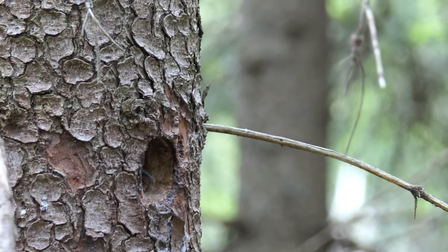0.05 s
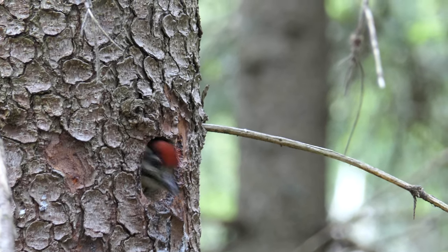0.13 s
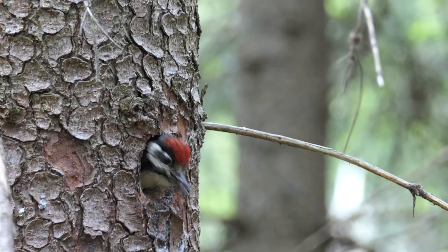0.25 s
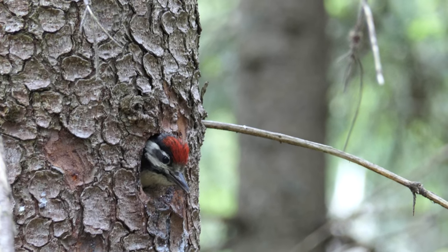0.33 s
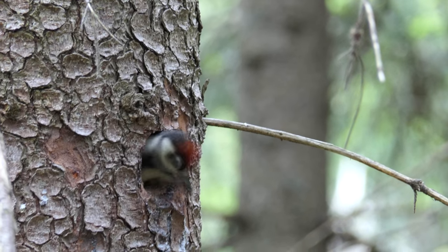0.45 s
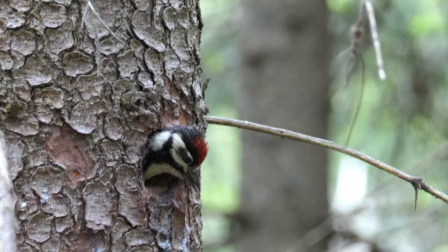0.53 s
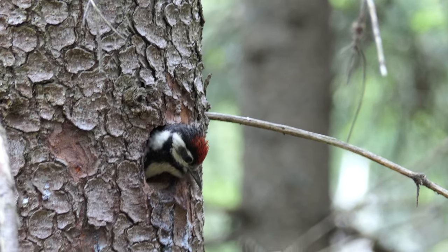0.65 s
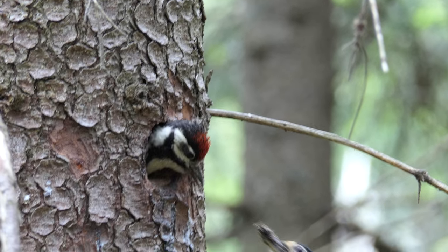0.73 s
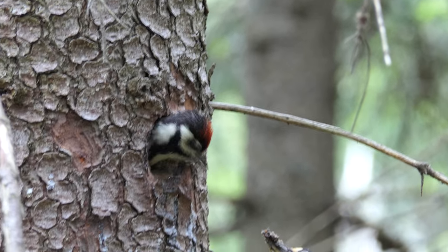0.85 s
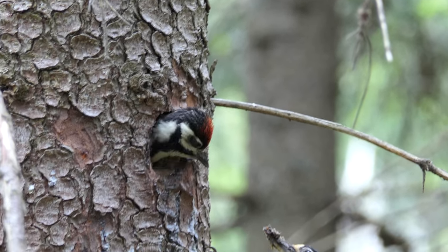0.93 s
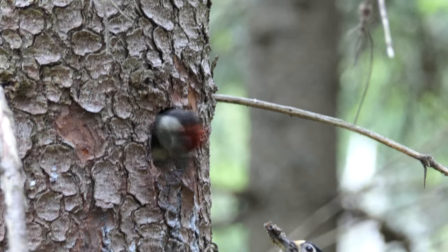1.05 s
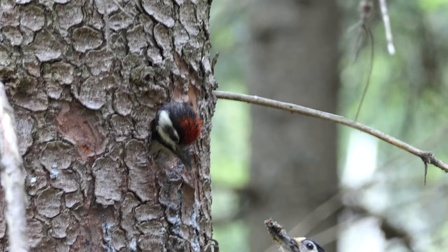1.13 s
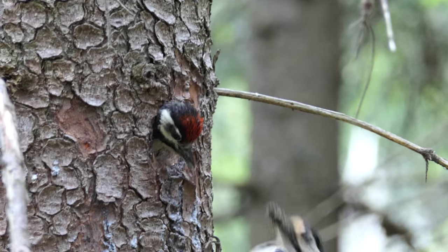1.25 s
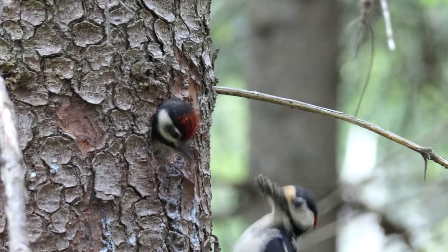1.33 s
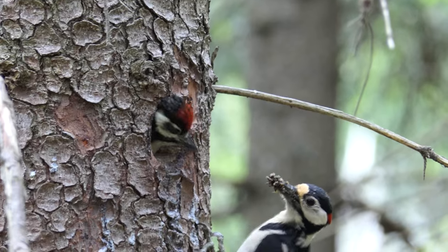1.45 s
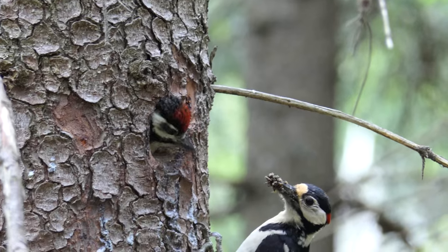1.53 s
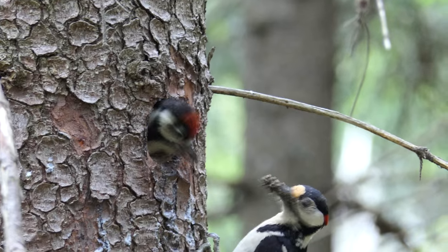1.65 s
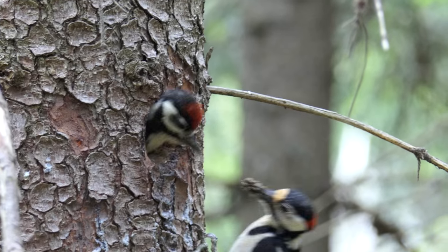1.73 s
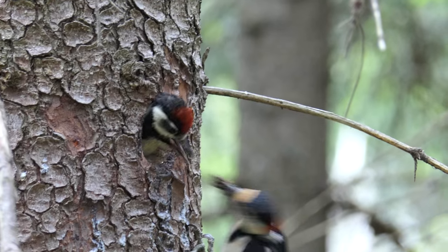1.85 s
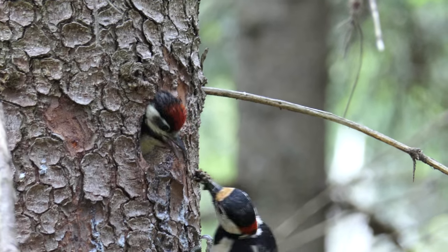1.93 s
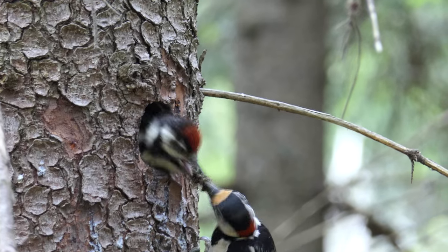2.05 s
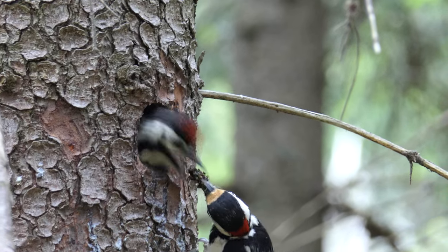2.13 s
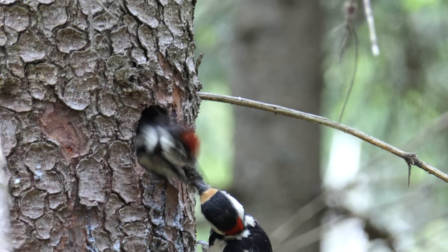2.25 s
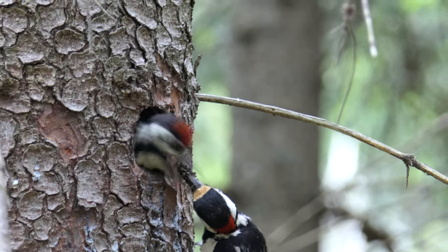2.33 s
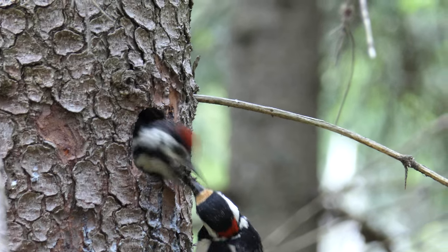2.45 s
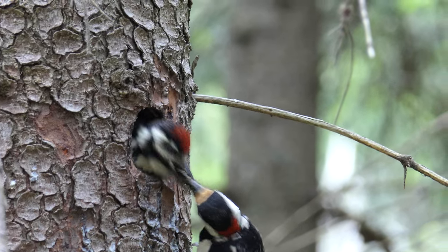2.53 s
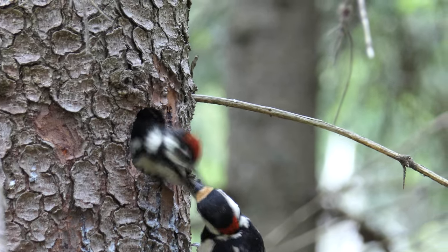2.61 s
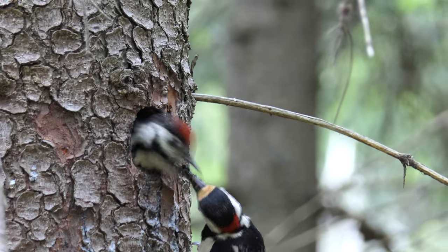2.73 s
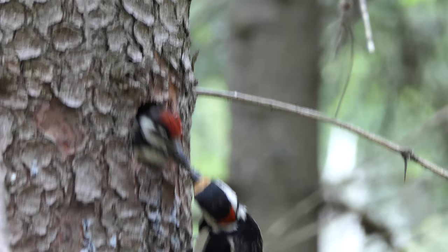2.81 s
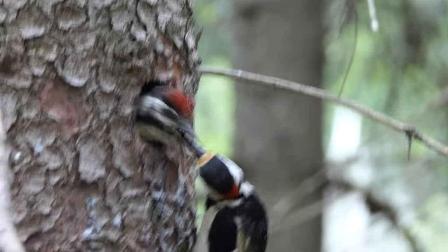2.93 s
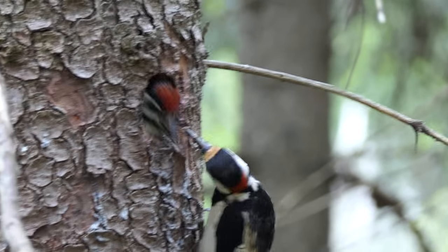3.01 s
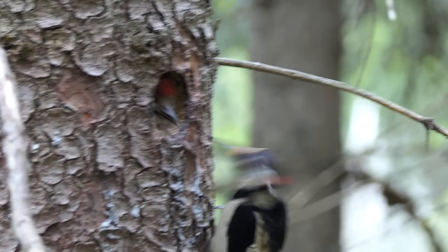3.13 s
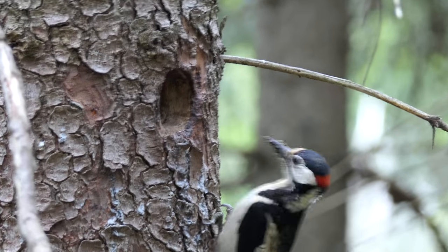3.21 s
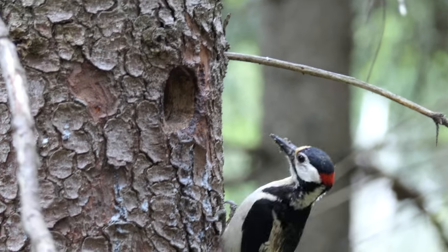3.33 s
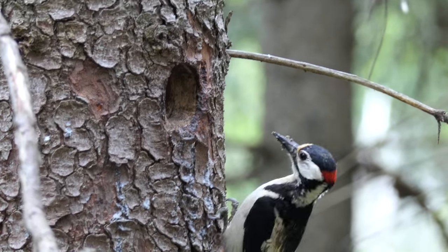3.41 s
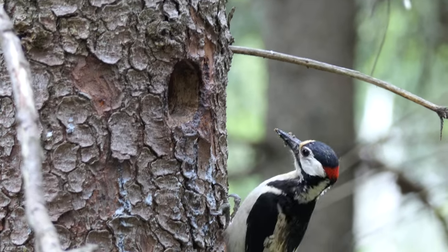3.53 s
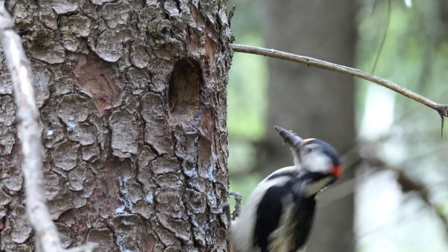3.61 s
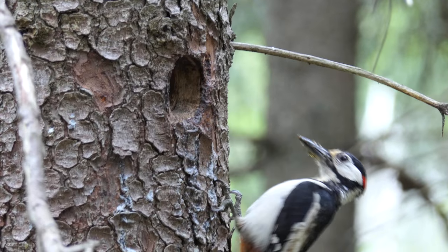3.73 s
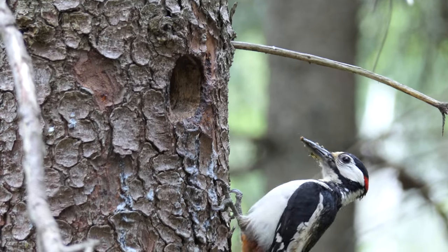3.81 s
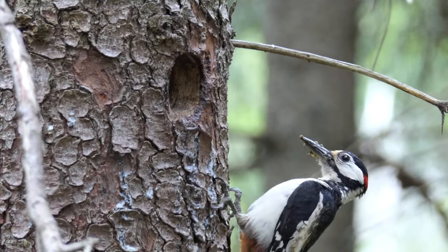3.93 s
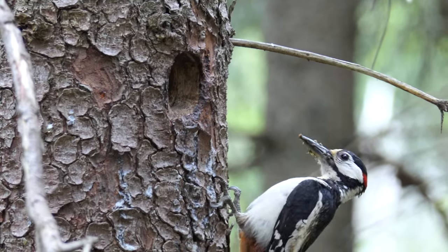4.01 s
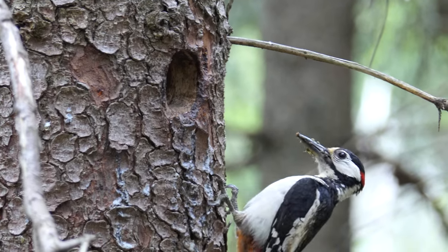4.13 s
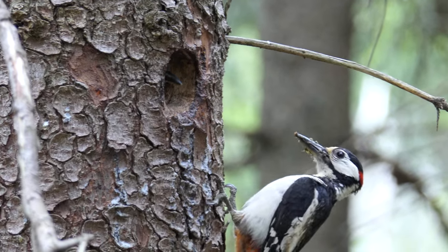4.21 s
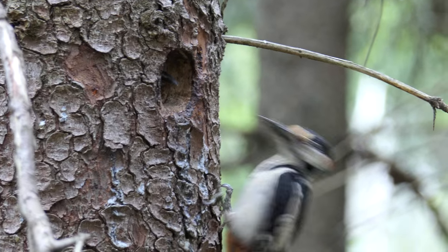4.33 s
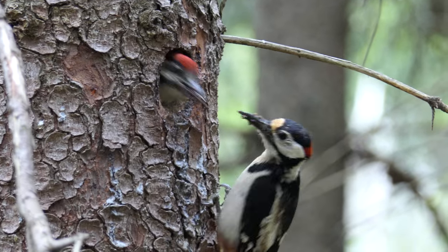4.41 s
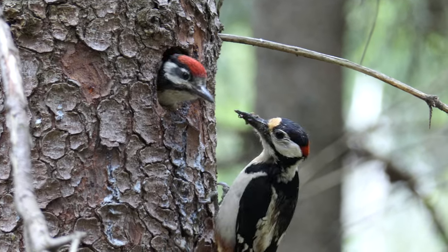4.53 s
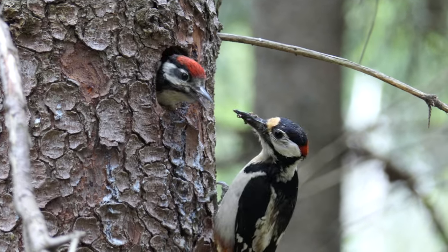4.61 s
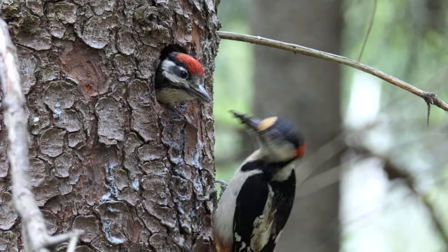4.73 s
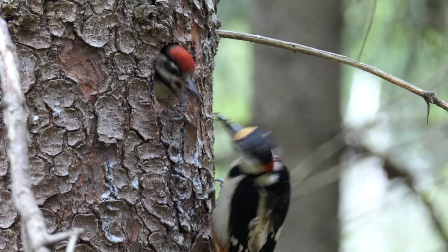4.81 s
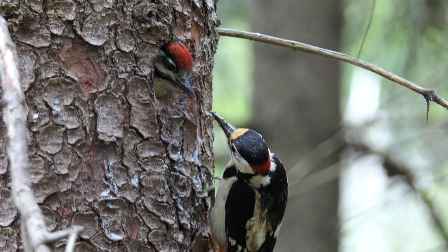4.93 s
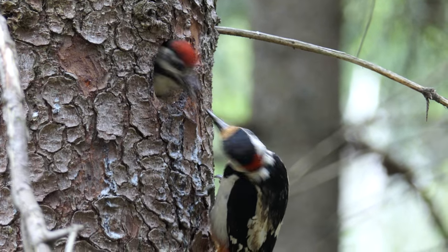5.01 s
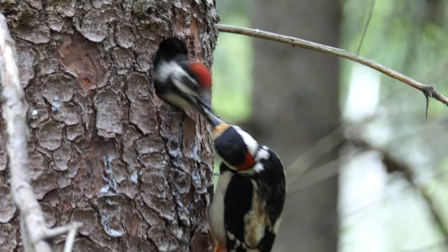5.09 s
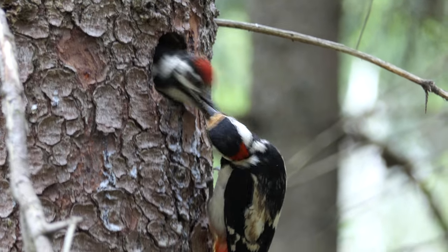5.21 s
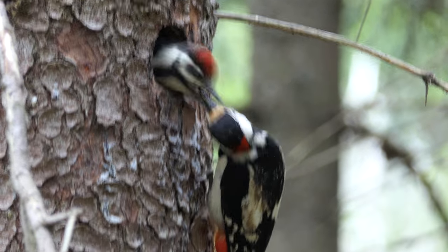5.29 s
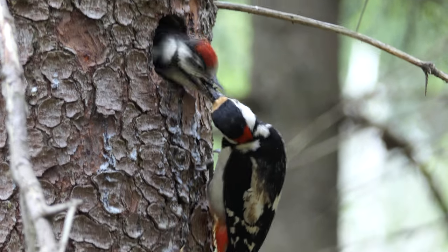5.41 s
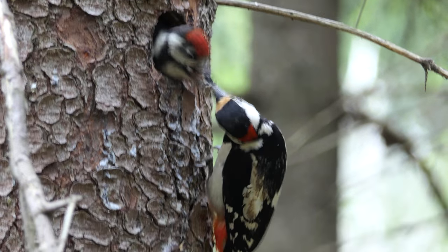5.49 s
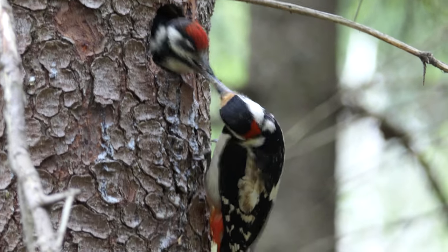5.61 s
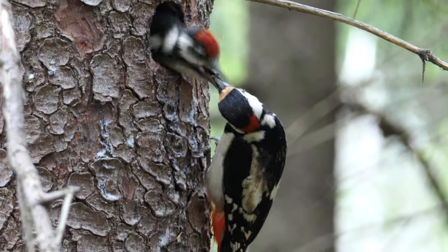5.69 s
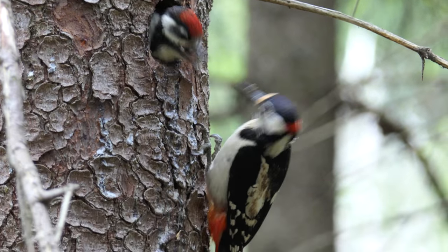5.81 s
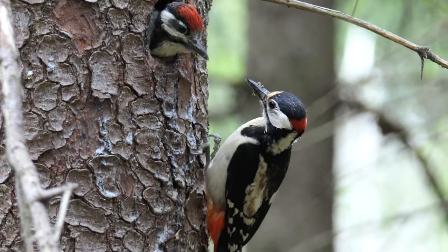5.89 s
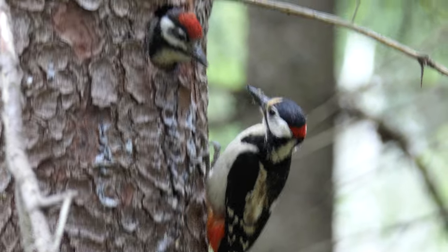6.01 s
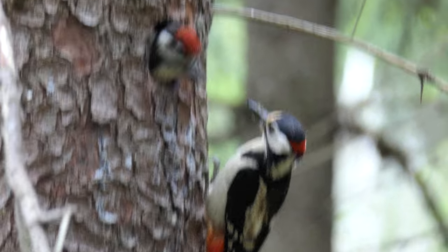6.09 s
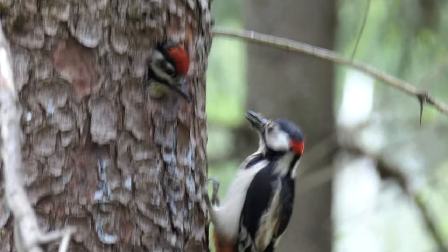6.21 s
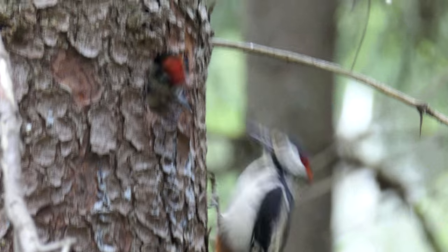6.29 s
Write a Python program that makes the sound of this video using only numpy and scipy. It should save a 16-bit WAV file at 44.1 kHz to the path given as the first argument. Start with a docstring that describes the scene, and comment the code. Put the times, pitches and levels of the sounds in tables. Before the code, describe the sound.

Woodpecker chicks beg with rapid, high, raspy squeaks from a tree hole, with occasional light taps on bark in a quiet forest.

```python
"""Young woodpeckers begging

Chicks in a nest hole in a spruce trunk squeak, squawk and peep. Each call is a puff of breath,
then a tone rich in overtones whose pitch rises and falls. The trees scatter it into a hazy echo.
Bills and claws tap the bark now and then, over a faint forest hush, heard by two close microphones."""
import sys
import numpy as np
from scipy import signal
from scipy.fft import rfft, irfft, next_fast_len
from scipy.io import wavfile

SR = 44100
rng = np.random.default_rng(int(sys.argv[2]) if len(sys.argv) > 2 else 0)


def put_to_file(sound):
    """Save the sound as 16-bit audio at rate SR, in the file named by the first command-line argument."""
    columns = np.atleast_2d(sound).T  # one column per channel
    safe = np.clip(columns, -1, 1)
    whole_steps = np.round(safe * 32767)
    wavfile.write(sys.argv[1], SR, whole_steps.astype(np.int16))


N = 280035
RUN_IN = SR // 4   # samples before time zero, so that an earlier call still echoes


def from_db(db):
    """Turn decibels into a gain to multiply by."""
    return 10 ** (np.asarray(db) / 20)


def rms_one(x):
    """Scale a signal to an average strength (rms) of 1."""
    return x / np.sqrt(np.mean(x ** 2) + 1e-20)


def at_hz(points, hz):
    """Read between the rows of a (Hz, value) table, with octaves evenly spaced."""
    return np.interp(np.log(hz), np.log(np.array(points)[:, 0]), np.array(points)[:, 1])


def colour(x, gain):
    """Filter a signal by a gain that depends on frequency."""
    size = next_fast_len(x.shape[-1])
    hz = np.fft.rfftfreq(size, 1 / SR) + 1
    return irfft(rfft(x, size) * gain(hz), size)[..., :x.shape[-1]]


def band_pass(x, low_hz, high_hz):
    """Keep what lies between two frequencies."""
    return signal.sosfilt(signal.butter(2, [low_hz, high_hz], "band", fs=SR, output="sos"), x)


def flutter(rate_hz):
    """Random wavering of strength 1, mostly slower than the given rate."""
    low_pass = signal.butter(2, rate_hz, fs=SR, output="sos")
    return rms_one(signal.sosfilt(low_pass, rng.standard_normal(N + RUN_IN)))


def noise_bands(length):
    """Third-octave noises: centre in Hz, mid (same in both ears), side (opposite in each)."""
    white = rng.standard_normal((2, 2, length))
    edges = 28 * 2 ** np.arange(0, 9.4, 1 / 3)
    for k, (low, high) in enumerate(zip(edges, edges[1:])):
        yield np.sqrt(low * high), *band_pass(white[k % 2], low, high)


def squeaks(hoarse=0.26):
    """List the clear squeaks of the chick at the entrance; hoarseness runs from 0 to 1."""
    # Each row: time of the highest pitch in seconds; lead-in, rise and fall in ms; highest pitch in Hz;
    # squareness of the rise; first swell in dB; dip and second swell in dB against the first;
    # harmonics 1, 3 and 4 upward in dB against harmonic 2.
    rows = [(-0.14, 7.6, 20, 10, 2460, 2.2, -12, -3, -20, -22, -6, 0),
            (0.055, 4.6, 21, 23.9, 2516, 2.2, -23, -1, 0, -7, -2.5, -3.5),
            (0.2475, 6.4, 22, 17.7, 2312, 2.5, -21.5, -8.5, 2.5, -9, -1.5, 2.5),
            (0.4379, 6.5, 29.4, 16.6, 2168, 3.3, -20.5, -10, 1, -11, 3, 1),
            (0.672, 0.23, 34.2, 17.8, 2338, 1.77, -22, -9, -3, -7, 5, -4),
            (0.851, 4.6, 31, 22, 2064, 3.4, -26, -5, -3.5, -5, 5, 1),
            (1.0497, 11.5, 16, 35.7, 2100, 1.9, -31.5, -3.5, -1, -4, 4, -4.5),
            (1.2585, 6.9, 24, 21, 2045, 4.8, -31.5, -4, 0, -4, 3, -0.5),
            (1.432, 9.8, 28.7, 17.7, 2102, 5.3, -29, -4, -1, -6.5, 4, -1),
            (1.6337, 4.8, 34, 17.8, 2296, 3.23, -27.5, -6.5, -2.5, -3.5, 4.5, -7.5),
            (1.8549, 3.7, 39, 17.8, 2274, 4.6, -24.5, -7, -0.5, -7, 3, -5.5),
            (2.0584, 5.3, 40, 15.2, 2230, 5.2, -27, -9, 0, -5, 4.5, 1),
            (2.2795, 9.5, 34.4, 25.5, 2390, 5.9, -34.5, 5.5, 4, -6, -7.5, -13.5),
            (2.533, 9.7, 26, 21.7, 2169, 6.6, -37, -11, 1.5, -6, -11, -45),
            (2.964, 7.7, 26, 14.5, 2176, 4.1, -37.5, 0.5, -2, -3, -15, -11.5),
            (3.1475, 16, 7.8, 26.4, 2122, 9, -45.5, -1.5, 0.5, -1.5, -15, -7),
            (4.1868, 7.7, 16.7, 19, 2102, 5.3, -38.5, -4.5, 4.5, 1.5, -4.5, -3),
            (4.3673, 8.3, 15, 21, 1995, 2.8, -36.5, 2.5, 3, 0.5, -7, -10),
            (4.5235, 7.9, 23, 22.4, 2114, 1.9, -33.5, 1, 1.5, -2.5, -2, -4.5),
            (4.6781, 0.045, 21, 20, 1855, 4.56, -39, 3, -11, 10, 11, -2.5),
            (4.853, 6.4, 16.5, 28.8, 1967, 3.16, -32, -5.5, -3, -0.5, 5.5, 1.5),
            (5.0551, 5.4, 26.8, 26.2, 2321, 2.83, -24, -8.5, -0.5, -7, 6, 1.5),
            (5.3139, 9.6, 32.7, 21.8, 2182, 6.8, -31, -12.5, 0, -7, -8.5, -20),
            (5.5869, 16, 29.6, 21, 2178, 5.8, -37.5, -12.5, 0.5, -5.5, -2.5, -11),
            (5.8875, 9.7, 16.9, 27, 2210, 2.5, -30, -22.5, -7.5, -3, 5, -1),
            (6.1826, 10, 10.8, 27.2, 2018, 5.8, -47.5, 9.5, 10, 2.5, -4.5, 3),
            (6.3754, 5, 28, 12, 2078, 5.6, -44.5, -4, -20, -3, -13, -11)]
    return [(*row, hoarse) for row in rows]


def squawks(hoarse=0.8):
    """List the broken, hoarse calls made while the chick swallows or sits back in the hole."""
    # Each row: time in seconds, highest pitch in Hz, then in dB as for squeaks: first swell, dip,
    # second swell, harmonic 1, harmonics 3 upward.
    rows = [(2.7283, 2022, -46.5, -11, -4.5, -3.5, -32), (3.3141, 2135, -50.5, -9.5, 3.5, 3.5, -7),
            (3.518, 1730, -57, -13, 0, 12, -3), (3.699, 1917, -53.5, 0.5, -3, 3, -12),
            (3.879, 1692, -47.5, 6, -25, -3.5, -18), (4.0399, 1730, -47.5, 3, -10, 6.5, 2),
            (5.272, 2132, -46, -3.5, 4, -7, -1)]
    lead_ms, rise_ms, fall_ms, squareness = 12, 19, 25, 3
    return [(s, lead_ms, rise_ms, fall_ms, hz, squareness, *levels_db, upper_db, upper_db, hoarse)
            for s, hz, *levels_db, upper_db in rows]


def peeps(hoarse=0.26):
    """List the thin, higher calls of a sibling deeper in the nest."""
    # Each row: time in seconds, highest pitch in Hz, first swell in dB.
    rows = [(3.377, 2565, -59), (3.55, 2490, -52.5), (3.7165, 2526, -51), (3.8882, 2517, -51.5),
            (4.069, 2520, -51), (4.2214, 2415, -52.5)]
    lead_ms, rise_ms, fall_ms, squareness = 6.9, 14, 29, 1.8
    voice_db = (7.5, -12, 5.5, 10.5, 2.5)   # the last five columns of a squeak
    return [(s, lead_ms, rise_ms, fall_ms, hz, squareness, db, *voice_db, hoarse) for s, hz, db in rows]


def chick_calls(rows):
    """Each call is a breath, then raspy harmonics on an arching pitch, all shaped by the throat."""
    # Tone of the throat and of the breath. Each row: frequency in Hz, level in dB.
    throat_tone = [(100, -107), (500, -10), (1000, -7.5), (1300, 0), (1700, 1), (2200, -8), (2700, 3),
                   (3200, 1.5), (4200, -1), (5200, -3.5), (6300, 2.5), (7000, -3.5), (7700, -7),
                   (9000, 0.5), (11500, -0.5), (14500, -8)]
    breath_tone = [(700, -6.5), (1400, 2), (2400, 10.5), (3700, -6.5), (5000, 5), (7500, -7.5), (10000, -4),
                   (14000, -8.5)]
    # Harmonics 4, 5 and 6, each in dB against the call's upper level.
    upper_trim = (-1.5, -1.5, -4)
    trim_db = np.r_[upper_trim, upper_trim[-1] - 6 * np.arange(1, 5)]   # 7 to 10 fall away
    start_hz, end_hz, muffle_db = 1292, 1065, -22.5
    harmonic = np.arange(1, 11)[:, None]
    wobble, shimmer = flutter(394), np.array([flutter(382) for _ in range(3)])
    air, smear = flutter(9000), flutter(1200)
    breath = rms_one(colour(rng.standard_normal(N + RUN_IN), lambda hz: from_db(at_hz(breath_tone, hz))))
    out = np.zeros(N + RUN_IN)
    for top_s, lead_ms, rise_ms, fall_ms, top_hz, squareness, *levels_db, hoarse in rows:
        swell_db, dip_db, second_swell_db, root_db, third_db, upper_db = levels_db
        breath_ms = 24 * (0.8 + hoarse)   # hoarse calls hiss longer and louder
        breath_db = swell_db + max(dip_db, second_swell_db, 0) - 17.5 + 5 * hoarse
        start_s, end_s = top_s - (breath_ms + lead_ms + rise_ms) / 1e3, top_s + fall_ms / 1e3
        at = np.arange(round(start_s * SR), min(round(end_s * SR), N)) + RUN_IN
        ms = ((at - RUN_IN) / SR - top_s) * 1e3   # 0 at the top of the arch
        voice_ms = ms + lead_ms + rise_ms   # 0 where the voice starts

        rise_gap_hz = (top_hz - start_hz) * np.clip(-ms / rise_ms, 0, 1) ** squareness
        fall_gap_hz = (top_hz - end_hz) * np.clip(ms / fall_ms, 0, 1) ** (fall_ms / 8.5)
        arch_hz = top_hz - rise_gap_hz - fall_gap_hz
        shut = (top_hz - arch_hz) / (top_hz - end_hz)   # the bill is nearly shut at low pitch
        rough = hoarse + 0.22 * shut
        pitch_hz = arch_hz * (1 + 0.075 * rough ** 2 * wobble[at])

        stack_db = np.r_[root_db, 0, third_db, upper_db + trim_db][:, None]
        bill_db = -7 * shut * np.maximum(harmonic - 1.5, 0)   # a shut bill dulls the overtones
        shimmer_db = 4 * np.tanh(rough) * np.sqrt(harmonic) * shimmer[:, at][harmonic[:, 0] % 3]
        # Overtones are muffled in the lead-in; the lowest harmonic gains at both ends.
        in_lead = np.clip(-rise_ms - ms + 0.5, 0, 1)
        ends_db = np.where(harmonic > 1, muffle_db * in_lead, 5 * shut)
        gains = from_db(stack_db + bill_db + shimmer_db + ends_db) * (harmonic * pitch_hz < 0.45 * SR)
        phase = 2 * np.pi * np.cumsum(pitch_hz) / SR
        voice = np.sum(gains * np.sin(harmonic * phase + harmonic ** 2), axis=0)
        voice /= np.sqrt(np.sum(from_db(stack_db) ** 2) / 2)
        # Air puffs once a cycle and smears every harmonic.
        puffs = from_db(-5) * air[at] * (1 + np.sin(phase))
        rasp = rough * (puffs + from_db(-3.5) * smear[at] * voice)

        progress = voice_ms / (lead_ms + rise_ms + fall_ms)
        shape_db = np.interp(progress, [0.125, 0.375, 0.625, 0.875], [-3, 0, dip_db, second_swell_db])
        fades = np.clip(voice_ms / 8, 0, 1) * np.clip((fall_ms - ms) / 7, 0, 1)
        breath_fades = np.clip(0.97 * (1 + voice_ms / breath_ms), 0, 1) * np.clip(1 - voice_ms / 20, 0, 1)
        out[at] += from_db(swell_db + shape_db) * fades * (voice + rasp)
        out[at] += from_db(breath_db) * breath_fades * breath[at]
    return colour(out, lambda hz: from_db(at_hz(throat_tone, hz)))


def microphones(x):
    """Direct sound reaches both microphones almost alike, with a faint smeared side part."""
    # Each row: frequency in Hz, level of the side part in dB.
    side_tone = [(500, -21), (2000, -21), (5500, -27), (8500, -18), (13000, -13)]
    smear = rng.standard_normal(200) * np.exp(-np.arange(200) / 40)
    side = signal.fftconvolve(x, smear / np.linalg.norm(smear))[:len(x)]
    return x + colour(side, lambda hz: from_db(at_hz(side_tone, hz))) * [[1], [-1]]


def forest_echo(x):
    """The nest trunk and branches return a quick haze; far trees add a longer, lumpy tail."""
    # Bumps and dips in the tail. Each row: delay in seconds, spread in seconds, level change in dB.
    lumps = [(0.046, 0.0036, 5.5), (.1, 0.01, -4), (.16, 0.015, -5.5)]
    # The far tail. Each row: frequency in Hz, seconds to fade by 60 dB, level in dB.
    tail = [(300, 0.18, 11), (1250, 0.33, 4), (2440, 0.59, 1.5), (5250, 0.51, 8.5), (6600, 0.66, 4.5),
            (9000, 0.38, 8), (14600, 0.38, 0)]
    # Stereo width. Each row: frequency in Hz, side against mid in dB.
    side_tone = [(500, -16), (2000, -16), (5500, -22), (8000, -12), (13000, -7)]
    tail, t = np.array(tail), np.arange(SR) / SR
    near_db, near_fade_s, far_db = -7, 0.029, -11.5
    near = from_db(near_db - 60 * t / near_fade_s) / np.sqrt(near_fade_s * SR / np.log(1e6))
    lumps_db = sum(db * np.exp(-((t - s) / spread) ** 2) for s, spread, db in lumps)
    far_gain = from_db(far_db + lumps_db + 0.73 * flutter(27)[:SR]) / np.sqrt(SR / 25)
    echo = 0
    for hz, mid, side in noise_bands(SR):
        dying_db = at_hz(tail[:, ::2], hz) - 60 * t / at_hz(tail, hz)
        far = far_gain * from_db(dying_db) * np.clip(t / 0.01, 0, 1)
        echo += (near + far) * (mid + from_db(at_hz(side_tone, hz)) * side * [[1], [-1]])
    # The echo lingers in one high band.
    ring_hz, width_hz, ring_fade_s, ring_db = 4552, 346, 4, -11
    ring = band_pass(rng.standard_normal(SR), ring_hz - width_hz / 2, ring_hz + width_hz / 2)
    echo += far_gain * from_db(ring_db - 60 * t / ring_fade_s) * np.clip(t / 0.13, 0, 1) * ring
    return signal.fftconvolve(x[None], echo, axes=1)[:, :len(x)]


def forest_hush():
    """A soft, wavering background hush with a low murmur, coloured by narrow hollow resonances."""
    # Each row: frequency in Hz, relative level in dB.
    tone = [(18, -54), (40, -23.5), (100, -6.5), (180, -7.5), (245, -14), (310, -17), (600, -10),
            (1200, -5.5), (1600, -10), (3400, -10), (4300, -18), (5200, -9), (7500, -19.5), (10000, -12),
            (15500, -24.5)]
    # Each row: frequency in Hz, typical random change of level in dB.
    waver = [(60, 2), (130, 2.5), (250, 4.5), (600, 3.5), (1500, 3), (10000, 1.5)]
    # Each row: frequency in Hz, how alike left and right are (1 means the same).
    likeness = [(30, 1), (100, 0.96), (500, 0.98), (3000, 1), (7000, 0.99), (9000, 1), (14000, 0.17)]
    # The low end swells and fades. Each row: time in seconds, level in dB.
    murmur = [(0.0, -71), (0.39, -71.5), (1.75, -72.5), (1.91, -74), (3.0, -74.5), (3.24, -75.5),
              (3.7, -74), (4.17, -77), (4.46, -72), (5.18, -76), (5.36, -72.5), (5.96, -77.5),
              (6.35, -68.5)]
    # Hollow resonances. Each row: centre in Hz, width in Hz, boost in dB.
    hollows = [(324.6, 48, 12.5), (408.8, 31, 11.5), (557, 114, 16), (826, 250, 6.5), (1060, 41, 9),
               (1259, 67, 14)]
    murmur_middle_db, murmur_top_hz = -73.5, 646
    out, steps_s = 0, np.linspace(0, N / SR, 50)
    swell_db = np.interp(steps_s, *np.transpose(murmur)) - murmur_middle_db
    for hz, mid, side in noise_bands(N):
        level_db = at_hz(tone, hz) + at_hz(waver, hz) * rng.standard_normal(len(steps_s))
        level_db += swell_db / (1 + (hz / murmur_top_hz) ** 2)
        gain = np.interp(np.arange(N) / SR, steps_s, from_db(level_db))
        alike = at_hz(likeness, hz)
        out += gain * (np.sqrt(1 + alike) * mid + np.sqrt(1 - alike) * side * [[1], [-1]])

    def hollow_gain(hz):
        """A bell-shaped peak for each hollow resonance."""
        return from_db(sum(db / (1 + (2 * (hz - centre) / width) ** 2) for centre, width, db in hollows))
    return colour(from_db(-61.5) * rms_one(out), hollow_gain)


def bark_taps():
    """A bill or claw rings the bark near the pitch that spot favours; a hard edge adds a tick."""
    # Each row: start in seconds, strength of the blow in dB, favoured pitch in Hz, tick strength in dB.
    taps = [(1.1197, -36.5, 950, -39), (1.998, -44.5, 1380, -46), (2.311, -46, 800, -37),
            (3.136, -53, 1500, -43), (3.74, -49.5, 480, -54), (4.093, -60, 1210, -52),
            (4.323, -68, 1310, -36), (5.269, -41.5, 677, -63), (5.731, -58, 1510, -46),
            (6.129, -32, 713, -28)]
    # The bark's ringing tones. Each row: pitch in Hz, level in dB, seconds to fade by 60 dB.
    bark_tones = [(420, 18.5, 0.0052), (775, 5, 0.017), (956, 0.5, 0.041), (1260, 8.5, 0.023),
                  (3200, 22, 0.025)]
    tick_fade_s, db_per_octave = 0.0085, -14
    start_s, blow_db, spot_hz, tick_db = np.transpose(taps)
    at = np.round(start_s * SR).astype(int) + RUN_IN
    hits = np.full(N + RUN_IN, 1e-18)
    hits[at] = from_db(tick_db)
    tick_level = signal.lfilter([1], [1, -from_db(-60 / (tick_fade_s * SR))], hits)
    out = band_pass(tick_level * rng.standard_normal(N + RUN_IN), 1500, 10500)
    for k, (hz, level_db, fade_s) in enumerate(bark_tones):
        octaves_away = np.abs(np.log2(hz / spot_hz))
        hits[at] = from_db(blow_db + level_db + db_per_octave * octaves_away)
        decay, angle = from_db(-60 / (fade_s * SR)), 2 * np.pi * hz / SR
        # This filter turns each hit into a fading sine wave.
        ring = signal.lfilter([0, np.sin(angle)], [1, -2 * decay * np.cos(angle), decay ** 2], hits)
        out += (-1) ** k * ring
    return signal.sosfilt(signal.butter(3, 330, "high", fs=SR, output="sos"), out)


def scene():
    """Mix the calls and taps, their echoes and the hush."""
    calls = chick_calls(squeaks() + squawks() + peeps())
    taps = bark_taps()
    direct = microphones(calls + taps)
    echoes = forest_echo(calls + from_db(-8) * taps)   # taps carry into the trees less than calls
    return (direct + echoes)[:, RUN_IN:] + forest_hush()


def record(dry):
    """Cut the highest treble steeply."""
    cutoff_hz = 15750
    return signal.sosfilt(signal.cheby2(18, 65, cutoff_hz, fs=SR, output="sos"), dry)


dry = scene()
out = record(dry)
put_to_file(out)
```